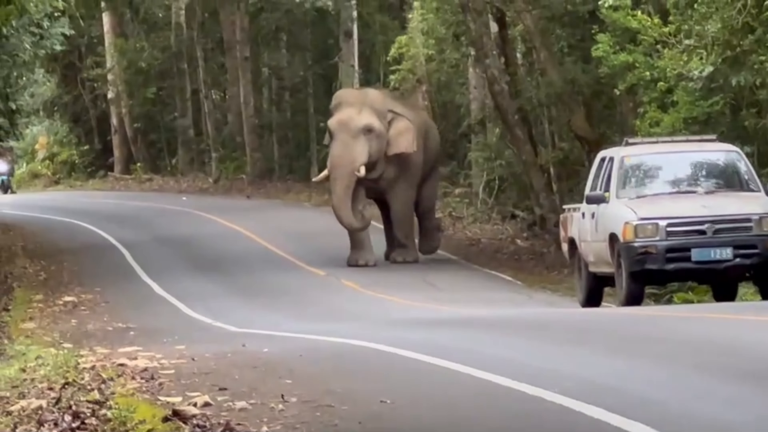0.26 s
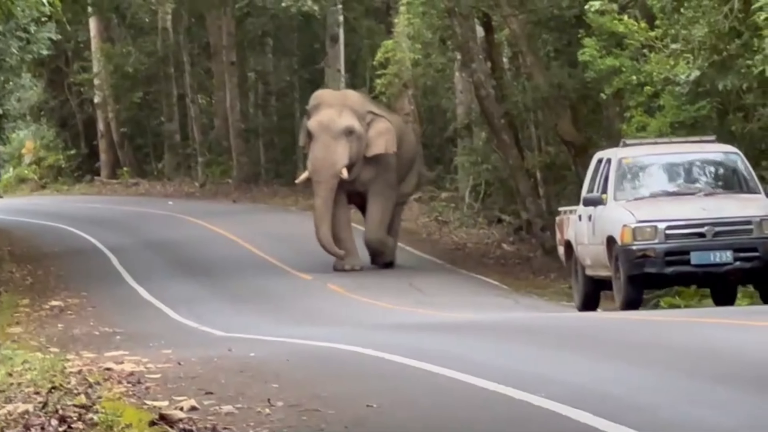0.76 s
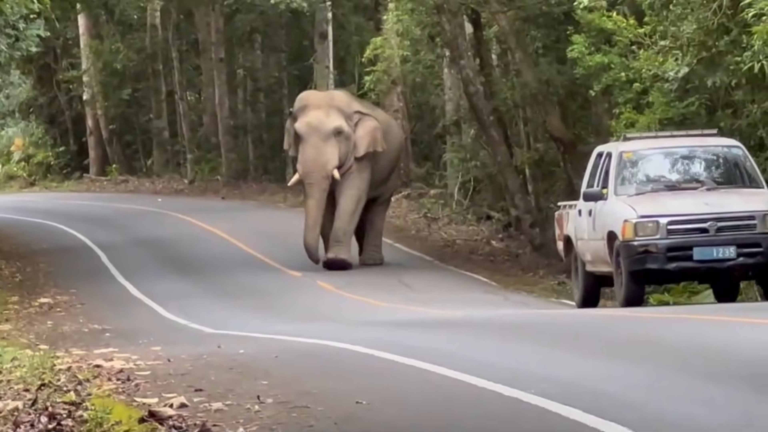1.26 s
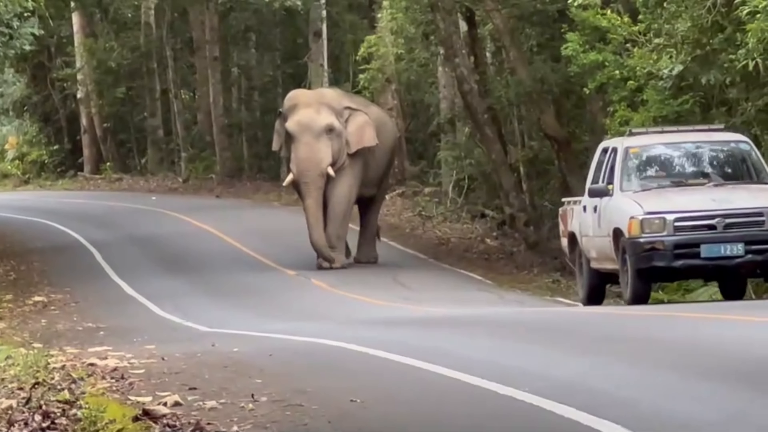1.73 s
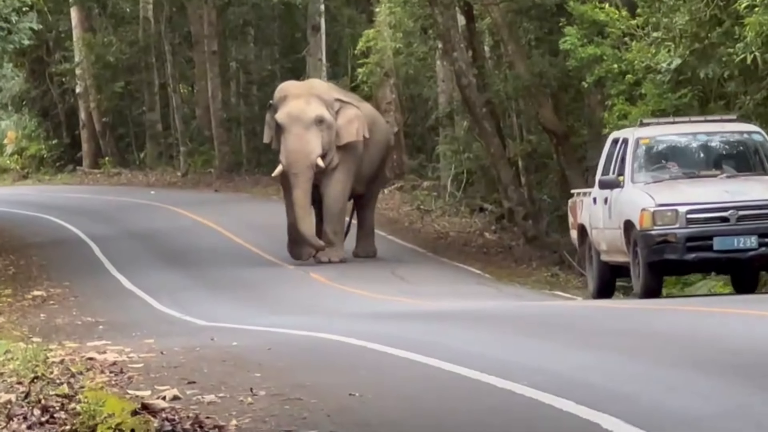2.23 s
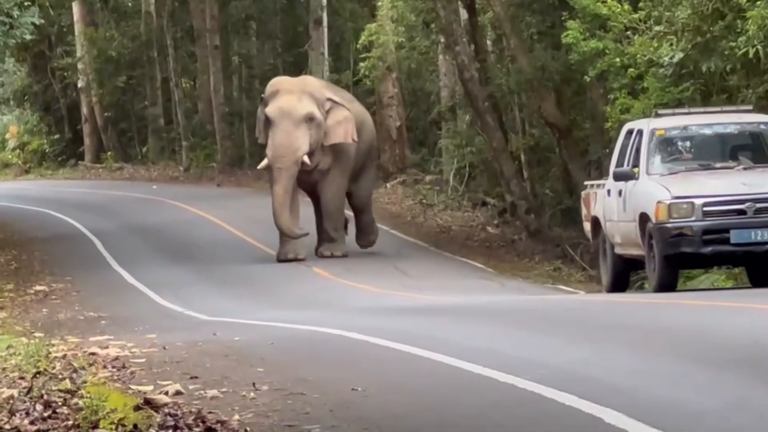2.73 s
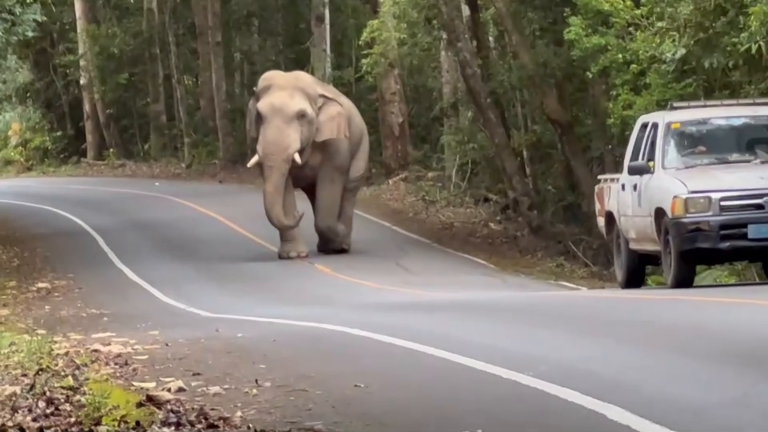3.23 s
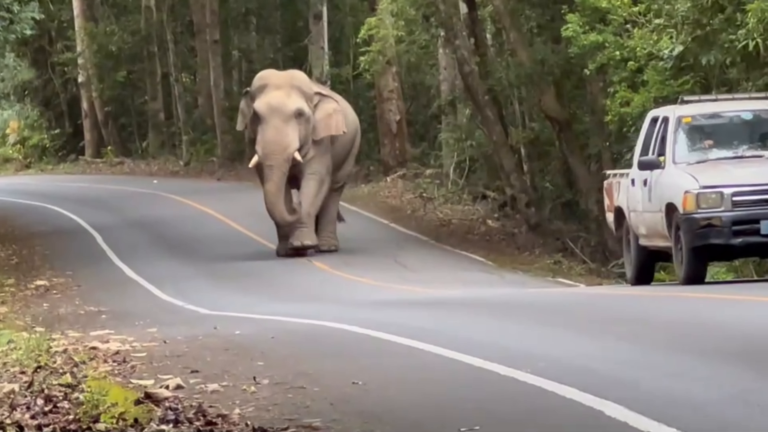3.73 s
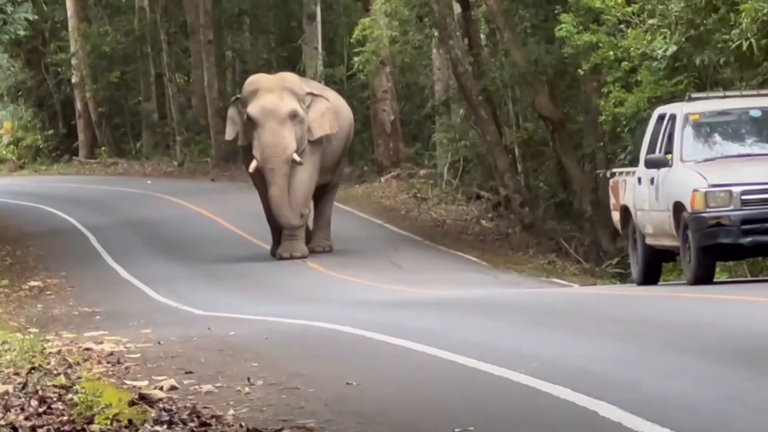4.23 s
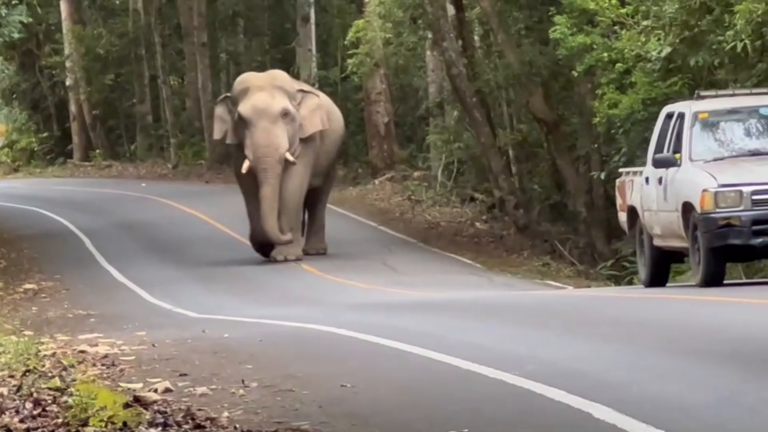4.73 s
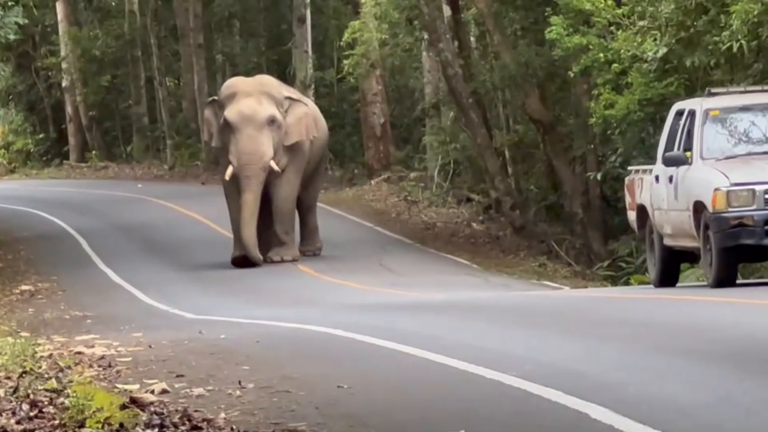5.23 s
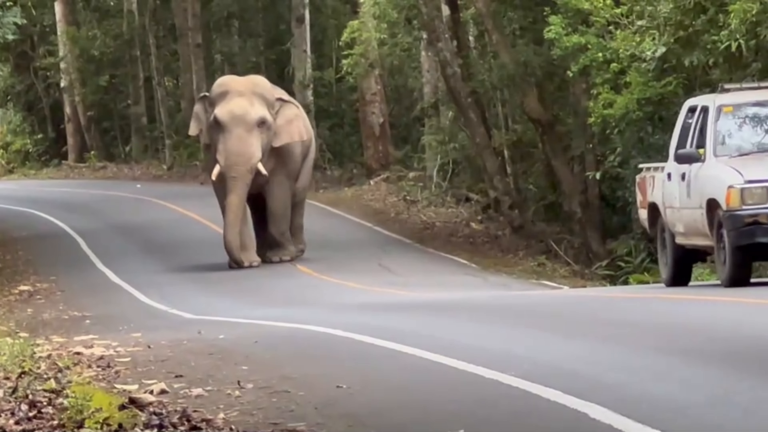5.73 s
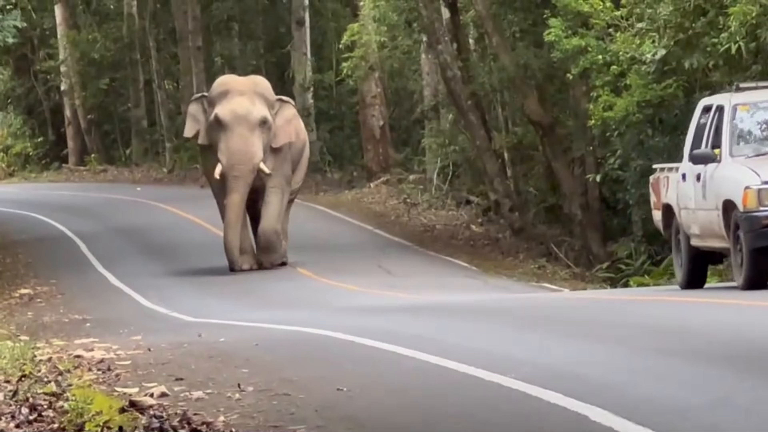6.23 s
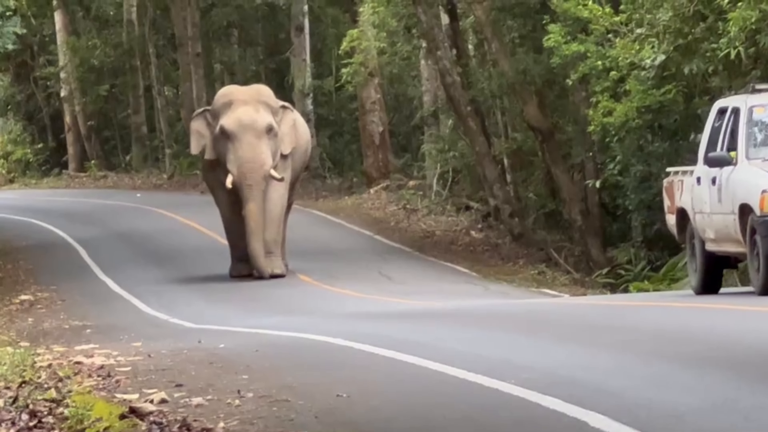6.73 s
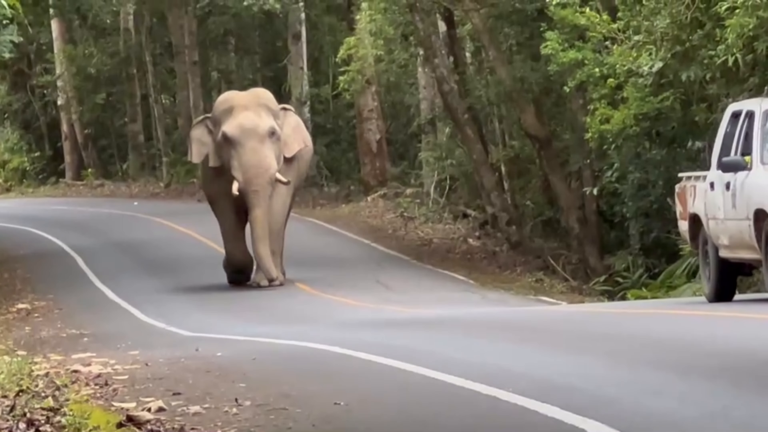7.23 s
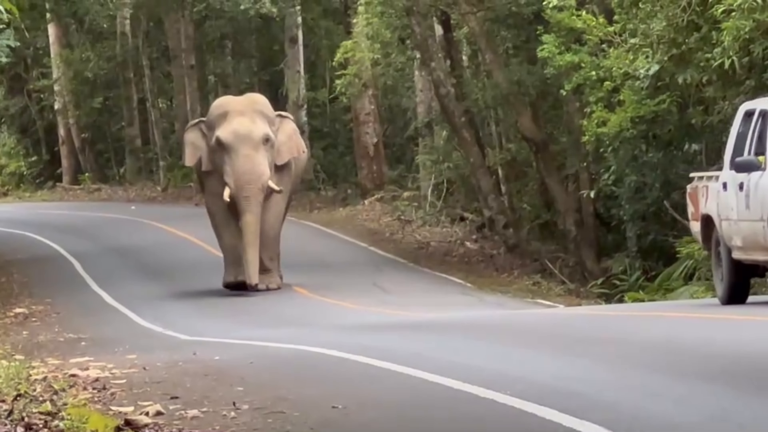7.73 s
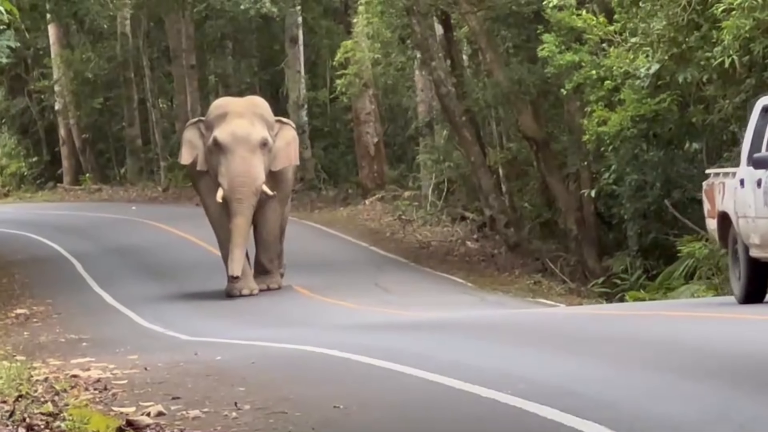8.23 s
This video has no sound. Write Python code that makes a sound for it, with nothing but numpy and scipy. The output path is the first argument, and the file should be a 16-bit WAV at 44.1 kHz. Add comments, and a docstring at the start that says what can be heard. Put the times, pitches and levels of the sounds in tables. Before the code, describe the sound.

Two gibbons whoop from roadside forest trees, short rising hoots overlapping long sliding calls, echoing over faint rustles, twig ticks and a soft outdoor hush.

```python
"""Two gibbons whooping in a forest

To the left, a nearer and a farther gibbon whoop: harmonic partials on gliding pitches, ringing on
in decaying-noise echoes. Leaves and cloth rustle as bursts of uneven noise grains, twigs tick as brief
band noise, a frog rattles in paired chirps, and an insect whistles as a wavering sine. Faint gliding
sines are probably small birds, the last probably a partial of the farther gibbon's long call.
Beneath lies a hush of coloured noise with a low rumble of far traffic.
"""
import sys
import numpy as np
from scipy import signal
from scipy.fft import rfft, irfft, next_fast_len
from scipy.io import wavfile
from scipy.ndimage import uniform_filter1d

SR = 44100
rng = np.random.default_rng(int(sys.argv[2]) if len(sys.argv) > 2 else 0)


def dump(signal):
    """Clip the signal to [-1, 1] and save it as 16-bit WAV at the path in sys.argv[1]."""
    limited = np.clip(np.atleast_2d(signal).T, -1, 1)
    pcm = np.round(limited * 32767).astype(np.int16)
    wavfile.write(sys.argv[1], SR, pcm)


N = 373086
LEAD = SR // 4   # samples of sound made before the scene opens
CUTOFF_HZ = 13200

# Spectrum of the hush. Each row: frequency in Hz, relative density in dB.
HUSH_SPECTRUM = [(15, -39.5), (25, 3), (64, 2), (163, 1.5), (552, -6.5), (953, -10.5), (1080, -11.5),
                 (1560, -13.5), (2430, -5), (2840, -13), (4300, -8.5), (4780, -18.5), (5300, -8.5),
                 (8030, -17.5), (12500, -38.5), (16200, -73), (22000, -120)]
# Stereo width of the hush. Each row: frequency in Hz, side over mid in dB.
HUSH_WIDTH = [(60, -19), (110, -16.5), (200, -12.5), (350, -6), (640, 1.5), (1150, 2.5), (2070, -7.5),
              (3740, 2), (6740, -5), (12200, 10)]
# Low rumble of far traffic. Each row: time in seconds, mean gain below 300 Hz in dB.
TRAFFIC_RUMBLE = [(0.0, -2), (8.46, 2)]
HUSH_DB = -72

# Insect notes. Each row: time of the crest in seconds, crest level before the flutter in dB.
INSECT_NOTES = [(1.486, -78), (1.87, -78), (2.042, -76), (2.204, -79), (2.488, -82)]
INSECT_HZ = 7920
INSECT_RISE_DB_PER_S, INSECT_FALL_DB_PER_S = 199, 114

# Bursts of rustle. Each row: time of full level in seconds, rise in seconds, hold in seconds,
# level in dB, extra level of the body below 4 kHz in dB.
RUSTLE_BURSTS = [(1.846, .05, 0.05, -75.5, 18.5), (2.044, .09, 0.15, -70, 1),
                 (2.49, .05, 0.036, -72.5, 2.5), (2.581, 0.13, 0.075, -65, -9.5),
                 (2.749, .05, .03, -73, -2), (3.608, .04, 0.016, -64, -3), (3.648, 0.054, .02, -57, -25),
                 (3.784, .08, 0.039, -66, -1.5), (3.861, 0.226, 0.0096, -60.5, -16.5),
                 (4.126, 0.31, 0.0093, -65.5, -9), (4.67, 0.011, 0.019, -60.5, -3),
                 (4.697, 0.034, 0.024, -59, -15.5), (4.879, 0.26, 0.00654, -64, -5),
                 (5.325, .07, 0.0108, -65, -10), (5.459, 0.096, 0.085, -57, -13), (5.66, .1, 0.14, -72, 3),
                 (5.991, 0.185, 0.011, -64.5, -6), (6.232, 0.82, .01, -70, 0.5),
                 (6.482, 0.033, .005, -71, -3), (6.91, 0.46, 0.0087, -76, 4)]
# Spectrum of the rustle. Each row: frequency in Hz, relative density in dB.
RUSTLE_SPECTRUM = [(290, -46), (500, -12), (580, 0.5), (892, 2.5), (1900, -8), (2520, 0.5), (4740, -6.5),
                   (7100, -5.5), (11100, -13.5), (12500, -10.5), (16200, -44), (22000, -120)]
# Stereo width of the rustle. Each row: frequency in Hz, side over mid in dB.
RUSTLE_WIDTH = [(60, -40), (110, -21), (200, -23), (350, -12), (640, 2), (1150, 1), (2070, -4.5),
                (3740, 2.5), (6740, -4), (12200, 8.5)]
RUSTLE_RISE_DB, RUSTLE_FALL_DB_PER_S = 19.5, 135.5

# Twig ticks. Each row: time in seconds, peak before panning in dB, centre in Hz, left minus right in dB,
# band edges as a factor of the centre.
TWIG_TICKS = [(1.835, -49, 2900, 0, 1.6), (1.842, -39, 2000, 0, 2.4), (1.870, -54, 2400, 0, 1.7),
              (1.997, -50, 2550, 1, 1.4), (2.019, -45, 2700, 0, 1.6), (2.045, -55, 2500, 0, 1.5),
              (3.116, -62, 1800, 3, 2.2), (3.815, -58, 1200, 3, 1.6), (3.922, -60, 1200, 3, 1.5),
              (4.668, -45, 4500, 0, 3.5), (4.693, -56, 2500, -3, 1.8), (4.83, -57, 1500, 0, 2.0),
              (5.114, -60, 3000, 0, 1.6), (6.485, -54, 5500, -3, 2.5), (6.845, -50, 3200, -1, 1.6),
              (7.375, -60, 4200, 0, 1.4)]
TICK_T60_S = 0.015

# Faint whistles, probably small birds; the last row is probably the fourth partial of the farther
# gibbon's long call. Each row: start in seconds, length in seconds, first pitch in Hz,
# last pitch in Hz, level in dB.
FAINT_WHISTLES = [(1.465, 0.172, 3560, 3796, -64.5), (1.492, .22, 4987, 5400, -67.5),
                  (5.91, 0.062, 4155, 4390, -52), (7.251, .47, 5220, 4890, -64),
                  (7.28, 0.15, 4280, 4367, -75), (8.394, .1, 2120, 2230, -65)]

# Frog rattles. Each row: start in seconds, length in seconds, mean first and last peaks in dB.
FROG_RATTLES = [(0.82, .19, -64, -56), (2.265, .29, -60, -59), (2.956, .17, -65, -61)]
FROG_LOW_HZ, FROG_HIGH_HZ, FROG_PULSE_S, FROG_PAIR_S = 2550, 3500, 0.0098, 0.013
FROG_PERIOD_S, FROG_UNEVEN_S, FROG_UNEVEN_DB = 0.0394, 0.002, 1.5

# What facing away does to the straight path. Each row: frequency in Hz, gain in dB.
FACING_AWAY_SHADE = [(500, -0.5), (1200, 0.5), (2000, -6.5), (2800, -4.5), (3600, -10.5), (6000, -10)]
# Forest echo, an early tail and a late one. Each row: level in dB, T60 in seconds.
ECHO_TAILS = [(-12, 0.46), (-20, 1.985)]
# Colour of the late tail. Each row: frequency in Hz, gain in dB.
LATE_TAIL_COLOUR = [(500, 3.5), (1000, -0.5), (2000, -0.5), (3500, 2), (6000, -2.5), (10000, -6)]
TAILS_ALIKE = 0.28   # share of the echo power common to left and right
FAR_WET_DB = 1.5     # the farther animal has more echo against its straight sound
SMALL_WET_DB = 0     # echo send of frog and whistles

# Level between the microphone ports for the trees. Each row: frequency in Hz, left minus right in dB.
PORT_LEVEL = [(60, -6.5), (110, -1.5), (200, -10), (350, 2), (640, 4), (1150, 10.5), (2070, 0.5),
              (3740, -0.5), (6740, -1), (12200, 0)]
# Phase between the ports. Each row: frequency in Hz, lead of the left in radians.
PORT_PHASE = [(0, 0.5), (260, -0.8), (600, 1.16), (1640, 0.25), (2410, 2), (2670, 2), (3790, 2),
              (4130, -0.5), (4740, 1.5), (5510, 6.5), (8610, 7.5), (10300, 8.5), (11400, -1.5), (12300, 16)]

# Throat resonances of the nearer gibbon. Each row: frequency in Hz, gain over the vocal effort in dB.
NEAR_THROAT = [(2000, -31.5), (3000, -26.5), (3500, -23), (3900, -14), (4300, -16), (4750, -28),
               (5300, -13), (6000, -28), (7000, -24.5), (8200, -29), (11000, -54)]
# Throat resonances of the farther gibbon. Each row: frequency in Hz, gain over the vocal effort in dB.
FAR_THROAT = [(2000, -28), (3100, -33.5), (3750, -17.5), (4200, -14), (4750, -28), (5300, -19.5),
              (5900, -21.5), (8000, -30.5), (11000, -55)]
# The mouth opens as pitch climbs. Each row: pitch in Hz, second partial over the fundamental in dB.
MOUTH_OPENING = [(500, -34), (640, -26), (780, -21), (880, -12.5), (980, -2), (1130, -2.5)]
# Third partial by where it falls. Each row: its frequency in Hz, level over the fundamental in dB.
THIRD_PARTIAL = [(1500, -11), (1750, -30), (2100, -43), (2400, -32), (2700, -46), (3100, -44.5),
                 (3500, -20), (3900, -10.5)]
# Short rising whoops of the nearer gibbon. Each row: start in seconds, fade-in in seconds, delay of the
# steepest rise in seconds, time scale of the rise in seconds, length in seconds, low pitch in Hz,
# top pitch in Hz, top level in dB, swell towards the top in dB, then the offsets of the second,
# third and upper partials in dB.
NEAR_WHOOPS = [(5.55, 0.024, 0.0716, .012, 0.12, 680, 1154, -32.5, 4.6, .1, 8.72, -0.5),
               (5.86, 0.018, 0.076, .013, 0.1016, 628, 954, -27, 16.9, .1, -5, -3),
               (6.74, 0.069, .108, .018, .168, 535, 924.5, -36, 6.3, .1, 6, 0)]
# Short whoops of the farther gibbon. Each row: the same twelve columns in the same units.
FAR_WHOOPS = [(0.5, 0.054, .098, .014, 0.15, 488.8, 1017, -38.5, 8, 1.2, -4.5, -3.5),
              (1.1, 0.041, 0.074, .014, 0.14, 471.2, 933, -43, 6.5, 7, -1, -6.5),
              (1.925, 0.033, .09, .014, .14, 493.2, 1027, -40, 9.4, 2, -11, -0.5),
              (3.11, .045, 0.092, 0.017, .14, 490.3, 1082, -35, 11.8, -1, -14, -3),
              (4.01, 0.044, .08, 0.0146, .13, 491.2, 989, -42, 5.4, 2.2, -7, -15.5),
              (5.43, 0.061, .095, .016, 0.15, 502, 1020, -37, 8.5, -2.5, -3, -5.5),
              (5.92, 0.049, 0.069, .016, .13, 497.5, 980.6, -38.5, 3, 2.3, 8.5, -3.5),
              (6.16, 0.019, 0.075, 0.012, .1, 551, 841, -33.5, 14.1, -2.5, -8.5, 0.5),
              (6.445, 0.08, 0.099, .012, 0.13, 526, 820, -37.5, 4.7, 4.94, 10.5, -2.5),
              (6.88, 0.026, .07, .015, .11, 543.4, 1057, -38, 4.4, 3, -5, 2),
              (7.225, .04, 0.074, 0.0132, 0.11, 560, 811, -42, 0.09, 3.7, 8, -1.5)]
# Long calls of the nearer gibbon, one list a call. Each row: time in seconds, pitch in Hz,
# fundamental in dB, second partial over it in dB.
NEAR_LONG_CALLS = [
    [(-.2, 609, -42, -26.5), (-.14, 700, -42, -31.5), (-.07, 1260, -28.5, 2.5), (-.04, 1318, -34.5, 0.5),
     (0.0, 1214, -32, -11.5), (0.058, 1080, -26.5, -14.5), (0.104, 1029, -27.5, -11.5),
     (0.158, 948, -34, -21.5), (0.206, 869, -29, -16.5), (0.294, 806, -34, -26.5),
     (0.376, 777.4, -35.5, -22.5), (0.42, 834, -64.5, -21.5)],
    [(0.94, 524, -70, -13.5), (0.966, 577, -43.5, -37), (0.99, 600, -40, -23), (1.02, 763, -31.5, -26.5),
     (1.056, 1131, -29.5, -4.5), (1.086, 1187, -48.5, 4.5), (1.17, 825, -30, -15.5),
     (1.282, 844.3, -29.5, -21.5), (1.306, 827.7, -30, -19), (1.488, 726.3, -35.5, -27.5),
     (1.57, 780, -39, -27)],
    [(6.91, 927, -52.5, -16), (6.955, 848, -47.5, -27), (6.982, 726.5, -41, -25.5), (7.04, 702, -39, -21),
     (7.126, 744.3, -40, -12), (7.386, 722.3, -40.5, -13.5), (7.544, 708, -37.5, -18),
     (7.642, 692.7, -42, -19.5), (7.768, 669, -49, -19), (7.79, 662, -49, -20)],
    [(7.81, 1050, -77, -20), (7.83, 1052, -56, -38), (7.908, 1128, -65.5, -8.5), (7.958, 905.9, -68, -39),
     (7.99, 755, -94, -27)],
]
# Long call of the farther gibbon. Each row: time in seconds, pitch in Hz, fundamental in dB,
# second partial over it in dB.
FAR_LONG_CALLS = [
    [(8.14, 506, -79, -16), (8.16, 517, -54, -29), (8.185, 550, -56.5, -24), (8.247, 606, -39.5, -24),
     (8.283, 716, -48, -8), (8.315, 654, -66, -13), (8.369, 576.6, -54.5, -16.5), (8.46, 564, -57, -34)],
]
# Voice of each nearer long call. Each row: third-partial offset in dB, upper-partial offset in dB.
NEAR_LONG_VOICE = [(4, 3), (3.2, -2), (6.5, -8), (-3, -16)]
# Voice of the farther long call. Each row: third-partial offset in dB, upper-partial offset in dB.
FAR_LONG_VOICE = [(2.1, -6)]
UPPER_FLICKER_DB = 3.5
SWELL_BEND = 0.95                # power law of the swell over the climb
TOP_QUICKER = 0.75               # the rise rounds off at the top in this share of its time scale
CREEP, CREEP_BEND = 0.15, 1.8    # share of the rise that creeps up over the whole whoop, its power law
FADE_IN_DB, CUT_DB, CUT_S = 30, 14.5, 0.022   # depth of the fade-in; the voice breaks off at the end
NEAR_TRUNK_DB, NEAR_TRUNK_S = -11.5, 0.011    # echo off the nearest trunk: level, delay
FAR_TRUNK_DB, FAR_TRUNK_S = -10, 0.0088


def from_db(db):
    """Decibel law: the amplitude gain of a level in dB."""
    return 10 ** (np.asarray(db) / 20)


def rms_one(x):
    """Power normalisation: scales a signal to rms 1."""
    return x / np.sqrt(np.mean(x ** 2) + 1e-20)


def at_hz(points, hz):
    """Logarithmic frequency scale: interpolates a spectrum table between its points."""
    at, value = np.transpose(points)
    return np.interp(np.log(hz + 1), np.log(at + 1), value)


def bins_hz(size):
    """Discrete Fourier transform: the frequencies of its bins."""
    return np.arange(size // 2 + 1) * SR / size


def drift(rate, size):
    """Random modulation: noise through a two-pole low-pass at rate Hz, of rms 1."""
    r = np.exp(-2 * np.pi * rate / SR)
    noise = rng.standard_normal(size + 8000)
    return rms_one(signal.lfilter([1], [1, -2 * r, r * r], noise)[8000:])


def add(out, x, at):
    """Superposition: sums x into out from sample at."""
    x = x[..., :out.shape[-1] - at]
    out[..., at:at + x.shape[-1]] += x


def coloured(x, spectrum):
    """Linear filtering: multiplies the spectrum by a table of gains."""
    size = next_fast_len(x.shape[-1] + 2048)
    gain = from_db(at_hz(spectrum, bins_hz(size)))
    return irfft(rfft(x, size) * gain, size)[..., :x.shape[-1]]


def spread(source, spectrum, side_db):
    """Mid-side stereo: two unrelated noises form sum and difference, the mid normalised to rms 1."""
    size = next_fast_len(N)
    hz = bins_hz(size)
    mid_gain = from_db(at_hz(spectrum, hz))
    side_gain = mid_gain * from_db(at_hz(side_db, hz))
    mid, side = irfft(rfft(source, size) * [mid_gain, side_gain], size)[:, :N]
    return np.array([mid + side, mid - side]) / np.std(mid)


def hush():
    """Diffuse noise field: far leaves and insects waver gently over a rumble that swells on its own."""
    waver_db = 1.1 * drift(2.3, N)
    both = from_db(HUSH_DB + waver_db) * spread(rng.standard_normal((2, N)), HUSH_SPECTRUM, HUSH_WIDTH)
    low = signal.sosfiltfilt(signal.butter(2, 300, fs=SR, output="sos"), both)
    swell_db = np.interp(np.arange(N) / SR, *np.transpose(TRAFFIC_RUMBLE)) + 1.2 * drift(5.6, N)
    return both - low + from_db(swell_db) * low


def insect():
    """Modulated sine: a thin unsteady whistle in notes that rise fast and fade more slowly."""
    t = np.arange(N) / SR
    phase = 2 * np.pi * np.cumsum(INSECT_HZ * (1 + 0.008 * drift(60, N))) / SR
    notes = 0
    for s, db in INSECT_NOTES:
        below_db = np.maximum(INSECT_RISE_DB_PER_S * (s - t), INSECT_FALL_DB_PER_S * (t - s))
        notes = notes + from_db(db - below_db)
    flutter = from_db(2.5 * drift(30, N))
    return notes * flutter * np.sin(phase) * from_db([[-1.5], [1.5]])


def rustle():
    """Friction noise: bursts of dense uneven grains, each with its own share of body under 4 kHz."""
    t = np.arange(N) / SR
    grains = rng.standard_normal((2, N)) * from_db(1.8 * drift(250, N) + 0.5 * drift(25, N))
    both = spread(grains, RUSTLE_SPECTRUM, RUSTLE_WIDTH)
    body = signal.sosfiltfilt(signal.butter(2, 4000, fs=SR, output="sos"), both)
    bright_power, body_power = 0, 0
    for s, rise, hold, db, body_db in RUSTLE_BURSTS:
        rise_db = RUSTLE_RISE_DB * np.maximum(s - t, 0) / max(rise, 0.005)
        fall_db = RUSTLE_FALL_DB_PER_S * np.maximum(t - s - hold, 0)
        power = from_db(db - rise_db - fall_db) ** 2
        bright_power = bright_power + power
        body_power = body_power + power * from_db(2 * body_db)
    return np.sqrt(bright_power) * (both - body) + np.sqrt(body_power) * body


def ticks():
    """Impulsive excitation: a sharp snap and a few ms of dying noise in a band round a centre."""
    out, t = np.zeros((2, N)), np.arange(1200) / SR
    noises = rng.standard_normal((len(TWIG_TICKS), 2, 1200))
    for (s, db, hz, pan_db, span), noise in zip(TWIG_TICKS, noises):
        noise = noise + 5 * (t == 0)   # the snap leads
        band = signal.butter(2, [hz / span, min(hz * span, 0.45 * SR)], "band", fs=SR, output="sos")
        stereo = noise[0] + 0.37 * noise   # mostly common to both sides
        puff = signal.sosfilt(band, stereo * from_db(-60 * t / TICK_T60_S))
        side_level = from_db(db + np.array([[0.5], [-0.5]]) * pan_db)
        add(out, puff / np.abs(puff).max() * side_level, round(s * SR))
    return out


def whistles():
    """Frequency glide: soft sines pass between two pitches with a slight tremor."""
    out = np.zeros(N + LEAD)
    for s, length, first_hz, last_hz, db in FAINT_WHISTLES:
        along = np.arange(0, 1, 1 / (length * SR))
        hz = (first_hz + (last_hz - first_hz) * along) * (1 + 0.003 * drift(50, len(along)))
        tone = np.sin(2 * np.pi * np.cumsum(hz) / SR)
        add(out, from_db(db) * np.sqrt(np.sin(np.pi * along)) * tone, LEAD + round(s * SR))
    return out


def frog():
    """Pulse train: uneven croaks, each a pair of short upward chirps, the second on average weaker."""
    out = np.zeros(N + LEAD)
    along = np.arange(0, 1, 1 / (FROG_PULSE_S * SR))
    for start, length, first_db, last_db in FROG_RATTLES:
        croak_times = np.arange(0, length, FROG_PERIOD_S)
        for after, (shift, weaker, late, louder) in zip(croak_times, rng.standard_normal((12, 4))):
            s = start + after + FROG_UNEVEN_S * late
            db = first_db + (last_db - first_db) * after / length + FROG_UNEVEN_DB * louder
            hz = FROG_LOW_HZ + (FROG_HIGH_HZ - FROG_LOW_HZ) * along
            hz = hz * (1 + 0.05 * shift + 0.07 * drift(400, len(along)))
            chirp = np.sin(np.pi * along) * np.sin(2 * np.pi * np.cumsum(hz) / SR)
            add(out, from_db(db) * chirp, LEAD + round(s * SR))
            add(out, from_db(db - 3.0 + 2.5 * weaker) * chirp, LEAD + round((s + FROG_PAIR_S) * SR))
    return out


def forest(x):
    """Multiple scattering: decaying noise as the response of the trunks, duller with time."""
    t = np.arange(2 * SR) / SR
    shared, left, right = rng.standard_normal((3, len(t)))
    noise = np.sqrt(TAILS_ALIKE) * shared + np.sqrt(1 - TAILS_ALIKE) * np.array([left, right])
    response = 0
    for grain, (db, t60) in zip([noise, coloured(noise, LATE_TAIL_COLOUR)], ECHO_TAILS):
        decay = from_db(-60 * t / t60) * np.clip(t / 0.029, 0, 1)   # builds up over 29 ms
        response = response + from_db(db) * grain * decay / np.sqrt(np.sum(decay ** 2))
    return signal.fftconvolve(x[None], response, axes=1)[:, :len(x)]


def ports(x):
    """Interaural-like cues: level and phase between the ports vary with frequency."""
    size = next_fast_len(x.shape[1] + 4096)
    hz = bins_hz(size)
    right = from_db(-at_hz(PORT_LEVEL, hz)) * np.exp(-1j * np.interp(hz, *np.transpose(PORT_PHASE)))
    left = 2 / np.maximum(np.abs(1 + right), 1)   # holds the level of the mean, save where the sides cancel
    return irfft(rfft(x, size) * [left, left * right], size)[:, :x.shape[1]]


def whoop(start, fade, turn, glide, length, low_hz, top_hz, db, swell_db, second_db):
    """Sigmoid glide: control rows of a short whoop that fades in, swells and breaks off."""
    t = np.linspace(0, length, num=40)
    creep = CREEP * (t / length) ** CREEP_BEND
    time_scale = glide * np.where(t > turn, TOP_QUICKER, 1)
    climb = creep + (1 - CREEP) / (1 + np.exp((turn - t) / time_scale))
    hz = low_hz + (top_hz - low_hz) * climb
    fade_db = FADE_IN_DB * np.clip(1 - t / fade, 0, 1)
    cut_db = CUT_DB * np.clip(1 - (length - t) / CUT_S, 0, 1)
    level = db - swell_db * (1 - climb ** SWELL_BEND) - fade_db - cut_db
    return np.transpose([start + t, hz, level, at_hz(MOUTH_OPENING, hz) + second_db])


def call(rows, throat, third_db, bright_db, wobble, breath_db):
    """Source and resonance: ten gliding harmonics, the upper ones and breath growing with effort."""
    s, *columns = np.transpose(rows)
    t = np.arange(s[0], s[-1], 1 / SR)
    hz, db, open_db = [uniform_filter1d(np.interp(t, s, c), size=300, mode="nearest") for c in columns]
    low_db = [db, db + open_db, db + third_db + at_hz(THIRD_PARTIAL, 3 * hz)]
    phase = 2 * np.pi * np.cumsum(hz * (1 + wobble * drift(36, len(t)))) / SR
    # the top swells more gently than the second partial
    effort_db = 0.73 * (low_db[1] + 50) - 48.5 + bright_db
    upper_db = [effort_db + at_hz(throat, k * hz) + UPPER_FLICKER_DB * drift(22, len(t))
                for k in range(4, 11)]
    blur = np.cumsum(hz * 0.03 * drift(150, len(t))) * 2 * np.pi / SR   # cycle jitter of the upper partials
    stack = 0
    for k, partial_db in enumerate(low_db + upper_db):
        stack = stack + from_db(partial_db) * np.sin((k + 1) * (phase + blur * (k > 2)) + k)
    breath = coloured(rng.standard_normal(len(t)), throat) * from_db(effort_db + breath_db)
    fade = np.clip(np.minimum(t - s[0], s[-1] - t) / 0.008, 0, 1)
    return (np.sqrt(2) * stack + breath) * fade   # root 2 makes each partial's level an rms


def gibbon(whoops, long_calls, throat, trunk_db, trunk_s):
    """Early reflection: one animal's calls, each with a close echo that beats against the glide."""
    out = np.zeros(N + LEAD)
    short_calls = [(whoop(*row[:-2]), row[-2:]) for row in whoops]
    for rows, (third_db, bright_db) in short_calls + list(long_calls):
        voice = call(rows, throat, third_db, bright_db, wobble=0.0027, breath_db=7.0)
        start = rows[0][0]
        add(out, voice, LEAD + round(start * SR))
        add(out, from_db(trunk_db) * voice, LEAD + round((start + trunk_s) * SR))
    return out


def gibbons():
    """Individual resonance: near and far animals each call through a throat of their own."""
    near_long = zip(NEAR_LONG_CALLS, NEAR_LONG_VOICE)
    far_long = zip(FAR_LONG_CALLS, FAR_LONG_VOICE)
    near = gibbon(NEAR_WHOOPS, near_long, NEAR_THROAT, NEAR_TRUNK_DB, NEAR_TRUNK_S)
    far = gibbon(FAR_WHOOPS, far_long, FAR_THROAT, FAR_TRUNK_DB, FAR_TRUNK_S)
    return near, far


def scene():
    """Direct and reverberant sound: voices from the trees pass the ports, then the small sounds join."""
    near, far = gibbons()
    small = frog() + whistles()
    echo = forest(near + from_db(FAR_WET_DB) * far + from_db(SMALL_WET_DB) * small)
    straight = coloured(near + far + small, FACING_AWAY_SHADE)   # the echoes keep the highs the straight path loses
    trees = ports(straight + echo)[:, LEAD:]
    return trees + rustle() + ticks() + insect() + hush()


def record(dry):
    """Band limiting: the microphone drops the deepest bass and the top is cut steeply."""
    thin = signal.sosfilt(signal.butter(4, 42, "high", fs=SR, output="sos"), dry)
    return signal.sosfilt(signal.cheby2(12, 70, CUTOFF_HZ, fs=SR, output="sos"), thin)


dry = scene()
out = record(dry)
dump(out)
```